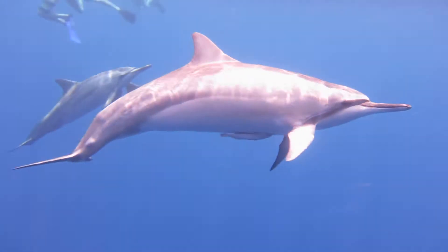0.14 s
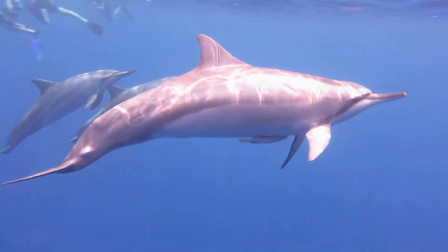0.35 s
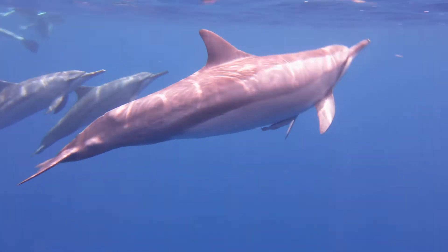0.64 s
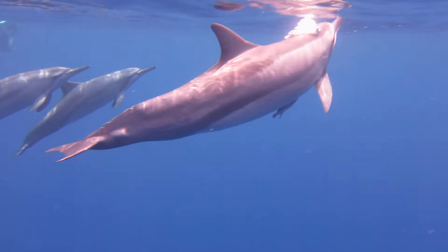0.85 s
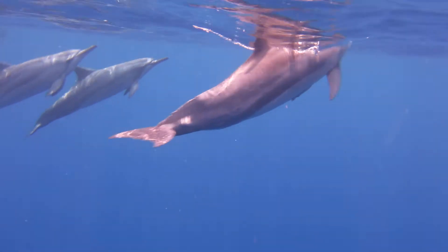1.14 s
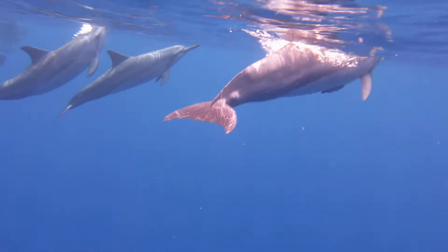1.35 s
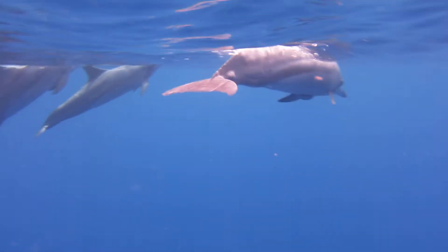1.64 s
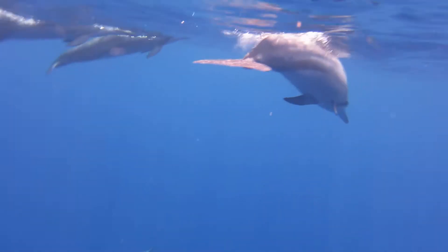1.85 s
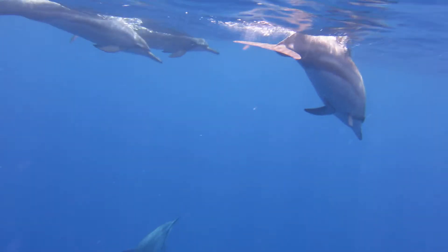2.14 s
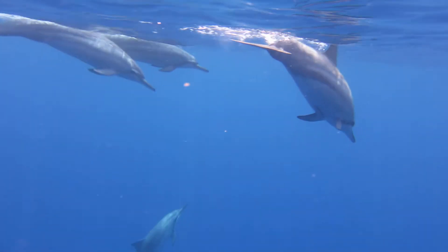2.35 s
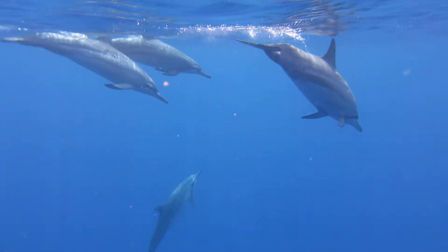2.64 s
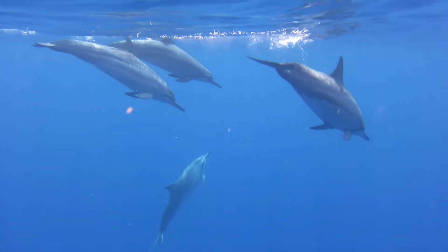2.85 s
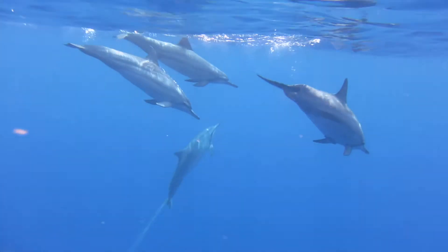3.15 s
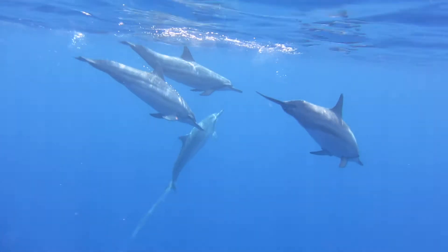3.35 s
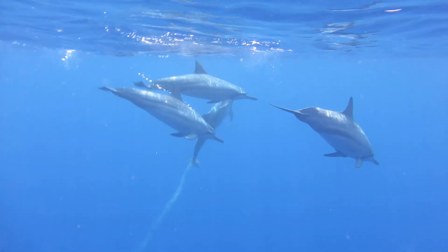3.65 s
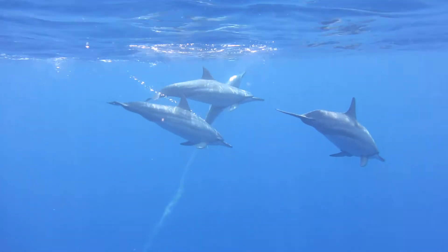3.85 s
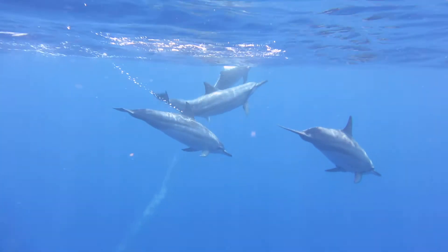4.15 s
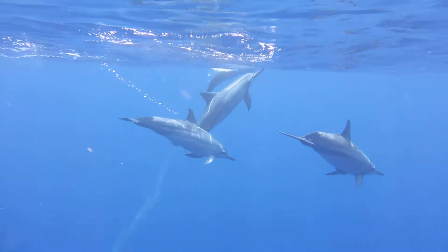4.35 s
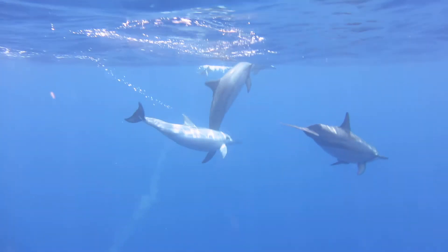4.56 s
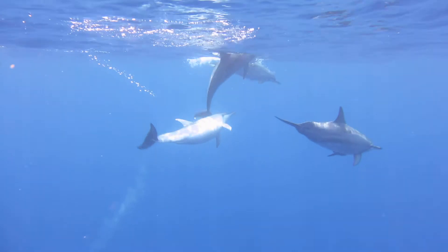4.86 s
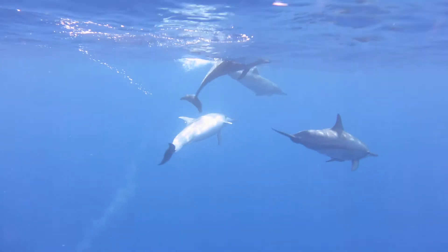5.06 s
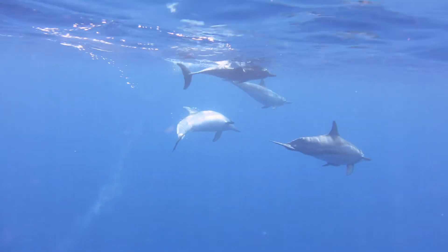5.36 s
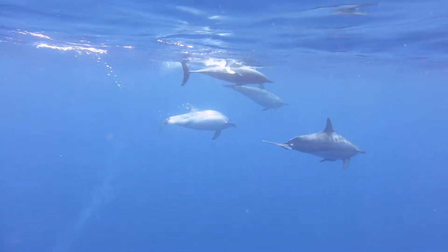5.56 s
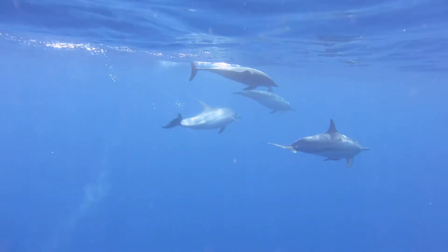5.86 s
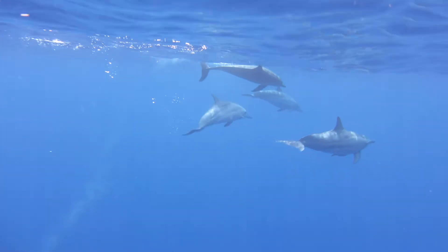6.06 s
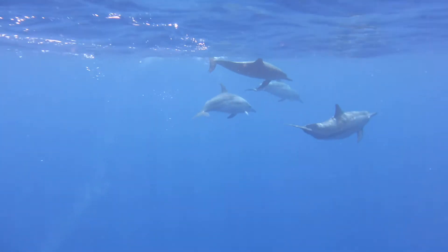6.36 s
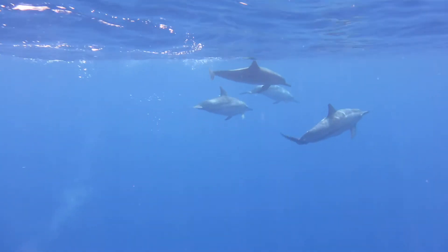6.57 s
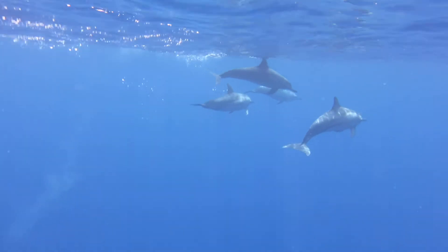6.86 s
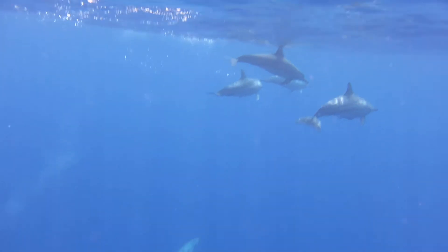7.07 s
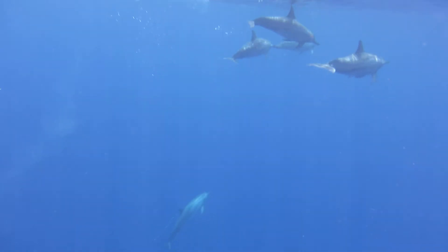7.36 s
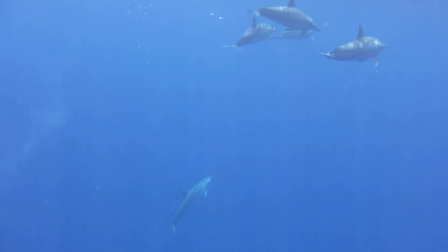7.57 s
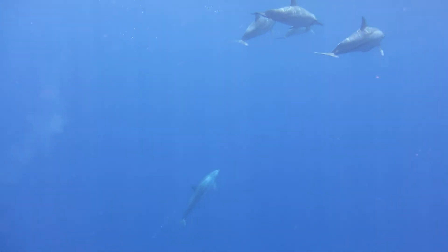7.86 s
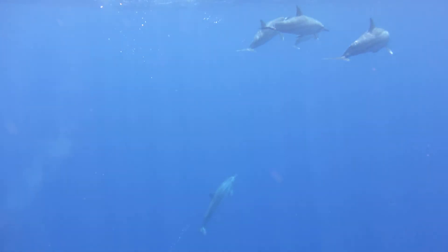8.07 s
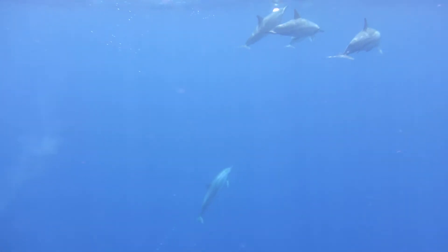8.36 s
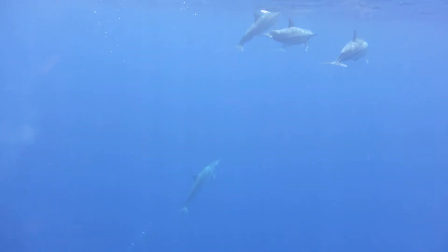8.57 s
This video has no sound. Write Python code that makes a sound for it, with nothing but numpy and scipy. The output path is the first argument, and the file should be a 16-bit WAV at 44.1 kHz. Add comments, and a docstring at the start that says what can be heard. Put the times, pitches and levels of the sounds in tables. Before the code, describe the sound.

A bright fizz of tiny bubbles dies away over the soft rush of open sea, heard from a camera held underwater. Uneven clusters of hollow knocks, small gurgles and faint finger rubbing come from its case. Quieter dolphins call all the way through with thin whistles that sweep up and dip, scattered clicks and four brief squawks. Past the middle, their clicks twice run together into a buzz.

```python
"""Dolphins pass a small camera in a waterproof case, just under the surface of a softly rushing sea.
First a cloud of bubbles fizzes. The hollow case starts to knock and gurgle in a swimmer's grip; it
colours the sounds from the water. Single dolphin clicks follow, then gliding whistles that echo off the
surface. Fingers rub the case, and rasping squawks lead into rising whistles. In the second half, two
runs of clicks come so fast that they buzz."""
import sys
import numpy as np
from scipy import signal
from scipy.fft import rfft, irfft, next_fast_len
from scipy.io import wavfile
from scipy.ndimage import uniform_filter1d, map_coordinates

SR = 44100
rng = np.random.default_rng(int(sys.argv[2]) if len(sys.argv) > 2 else 0)


def dump(signal):
    """Clip the signal to [-1, 1] and save it as 16-bit WAV at the path in sys.argv[1]."""
    limited = np.clip(np.atleast_2d(signal).T, -1, 1)
    pcm = np.round(limited * 32767).astype(np.int16)
    wavfile.write(sys.argv[1], SR, pcm)


N = 384552
T = np.arange(N) / SR
TOP_HZ = 15830  # the highest pitch the camera keeps


def amp(db):
    """Turn decibels into a gain."""
    return 10 ** (np.asarray(db) / 20)


def unit(x):
    """Scale a sound to an average power of 1."""
    return x / np.sqrt(np.mean(x ** 2) + 1e-20)


def along(points, hz):
    """Read between (pitch_hz, value) points on a musical pitch scale."""
    pitches, values = np.transpose(points)
    return np.interp(np.log(hz + 1), np.log(pitches + 1), values)


def wobble(rate):
    """A smooth curve through `rate` random values a second."""
    return map_coordinates(rng.standard_normal(int(N * rate / SR) + 4), [T * rate])


def filtered(x, response):
    """Change each frequency f in a sound by response(f)."""
    size = next_fast_len(N + SR // 2)
    return irfft(rfft(x, size) * response(np.fft.rfftfreq(size, 1 / SR)), size)[..., :N]


def resonances(modes):
    """A filter that rings at each (pitch_hz, width_hz, level_db)."""
    return lambda f: sum(amp(db) * 1j * f * width / (hz * hz - f * f + 1j * f * width)
                         for hz, width, db in modes)


def level(rows, fade_s=0.024):
    """A gain that follows (time_s, level_db) points and fades to silence outside them."""
    times, db = np.transpose(rows)
    return amp(np.interp(T, times, db)) * np.clip(np.minimum(T - times[0], times[-1] - T) / fade_s + 1, 0, 1)


def grains(rate, spread_db):
    """Random ticks, about `rate` a second, a few much larger than most."""
    size = amp(spread_db * rng.exponential(size=N)) * rng.standard_normal(N)
    return size * (rng.random(N) < rate / SR)


def placed(x, pan_db, lag_s, scatter_db=-4):
    """Two microphones: the left is pan_db louder and lag_s later; both get echoes inside the case."""
    side = np.array([[.5], [-.5]])
    direct = filtered(x, lambda f: amp(pan_db * side) * np.exp(-2j * np.pi * f * lag_s * side))
    tail = rng.standard_normal((2, SR // 40)) * amp(-60 * T[:SR // 40] / 0.008)
    echoes = signal.fftconvolve(direct, tail / np.linalg.norm(tail[0]), axes=1)[:, :N]
    return direct + amp(scatter_db) * echoes


# Where the wet microphone opening rings: pitch_hz, width_hz, level_db
PORT_TONES = [(3370, 330, 0), (5550, 520, 4.5), (10560, 530, -9), (12300, 2400, -5)]
def port(f, leak_db=-14):
    """The microphone opening favours its own tones, lets some of the rest leak by and dulls the top."""
    leak = amp(leak_db) * f / (f + 3000)
    return (resonances(PORT_TONES)(f) + leak) / (1 + (f / 14300) ** 20)


# The tone of the sea: pitch_hz, level_db
SEA_COLOUR = [(25, 4.5), (100, 3), (500, -3.5), (800, -11), (1200, -4.5), (1700, -11), (2600, -20.5),
              (13000, -27.5), (15700, -45)]
# How alike left and right are: pitch_hz, likeness (1 the same, -1 opposite)
SEA_LIKENESS = [(200, -0.63), (5000, 0.066)]
def sea():
    """Patchy noise of far surf and water; its bass pushes the two microphones opposite ways."""
    spectrum = signal.stft(rng.standard_normal((2, N)), nperseg=512)[2]
    patches = uniform_filter1d(uniform_filter1d(rng.standard_normal(spectrum.shape[1:]), 8, 0), 8, 1)
    noise = signal.istft(spectrum * amp(2.2 * unit(patches)), nperseg=512)[1][:, :N]
    colour = lambda f: amp(along(SEA_COLOUR, f)) * (1 + 0.57 * abs(port(f)))
    spread = lambda f: np.arccos(np.clip(along(SEA_LIKENESS, f), -1, 1)) / 2
    mid, side = filtered(noise, lambda f: colour(f) * [np.cos(spread(f)), np.sin(spread(f))])
    return amp(-43.5 + 0.41 * wobble(1.0)) * unit(np.array([mid + side, mid - side]))


# How the fizz swells and dies: time_s, level_db
FIZZ_LEVELS = [(0, -24.5), (.14, -22), (.34, -36), (.49, -49), (.52, -66)]
def fizz():
    """Tiny bubbles burst as dense ticks on a hiss; part of the cloud reaches each microphone alone."""
    def colour(f):
        through_port = np.hypot(abs(port(f)), 1.27 / (1 + (f / 13600) ** 20))
        treble = .12 + 1 / (1 + (4600 / (f + 1)) ** 8)
        return through_port * treble / np.hypot(1, f / 12000)

    froth = unit(grains(3000, 0.73)) + 0.3 * rng.standard_normal(N)
    cloud = placed(froth, pan_db=-5.5, lag_s=0.000185, scatter_db=-6) + 0.55 * rng.standard_normal((2, N))
    return level(FIZZ_LEVELS) * unit(filtered(cloud * amp(1.1 * wobble(92.5)), colour))


def ring(modes, t, attack_s):
    """Fading tones, with new strengths and slightly new pitches for each blow; the peak is 1."""
    tones = sum(amp(db + rng.normal(0, 5) - 60 * t / fade_s)
                * np.sin(2 * np.pi * hz * rng.normal(1, 0.032) * t) for hz, db, fade_s in modes)
    tones *= 1 - np.exp(-t / attack_s)
    return tones / np.abs(tones).max()


# Tones of the air in the case and of its stiff wall: pitch_hz, level_db, fade_s (time to fall 60 dB)
AIR_TONES = [(92, -12.5, 0.04), (276.6, -11.5, 0.033), (521.6, 1, 0.045), (778, -16.5, 0.048)]
WALL_TONES = [(1233, 11, 0.025), (1510, 23.5, 0.0073), (1982, 12.5, 0.025), (3096, 3.5, 0.024)]
# Blows on the case: start_s, level_db, crack_db (higher is sharper)
CASE_KNOCKS = [(0.105, -22.5, -19), (0.533, -20, -31), (0.579, -15, -30), (0.764, -28, -39),
               (0.96, -8.5, -21.5), (0.995, -10.5, -10), (1.038, -18.5, -20.5), (1.097, -25, -11.5),
               (1.138, -21.5, -14), (1.265, -27, -13), (1.317, -23, -30), (1.398, -20, -27.5),
               (1.461, -16.5, -27), (1.537, -21, -4), (1.562, -16, -33), (1.679, -5.5, -20.5),
               (1.73, -19, -27), (1.767, -7, -14), (1.806, -12.5, -26), (1.885, -12.5, -27),
               (1.904, -9.5, -17.5), (2.262, -17, -30.5), (2.29, -21.5, -24), (2.405, -12.5, -9.5),
               (2.423, -9, -26), (2.475, -9.5, -20), (2.651, -14.5, -21), (2.754, -17.5, -16),
               (2.78, -10.5, -8.5), (2.804, -19, -31), (2.843, -14, -20.5), (2.871, -16.5, -51),
               (3.211, -5.5, -21.5), (3.224, -6, -20), (3.276, -6.5, -16), (3.532, -12, -16.5),
               (3.644, -25.5, -42), (4.268, -15, -28), (4.306, -18.5, -35), (4.52, -32, -3.5),
               (4.89, -7.5, -25), (5.21, -30, -31), (5.257, -30, -7), (5.61, -16.5, -29),
               (5.667, -21.5, -45), (5.861, -25.5, -10.5), (6.218, -9.5, -25.5), (6.413, -7.5, -24),
               (6.434, -11.5, -18.5), (6.463, -18.5, -21), (6.956, -16.5, -20), (6.992, -16.5, -20.5),
               (7.098, -22.5, -21.5), (7.279, -20, -12), (7.294, -17.5, -30), (7.655, -11, -23.5),
               (7.752, -18, -30), (7.862, -15.5, -31), (7.962, -11.5, -29.5), (8.022, -13.5, -34),
               (8.105, -9.5, -23), (8.213, -16, -23.5), (8.367, -20.5, -15.5)]
def knocks():
    """Each blow rings the air inside, makes the wall snap and rattles on in three weaker taps."""
    out, t = np.zeros((2, N + SR)), np.arange(SR // 8) / SR
    for start, db, crack_db in CASE_KNOCKS:
        hollow = np.clip(1 - amp(crack_db), .1, 1)  # a sharp crack moves little air
        rattle = zip(rng.uniform(0.00612, 0.034, size=3), rng.normal(-21.0, 5.6, size=3))
        for late_s, weaker_db in [(0, 0), *rattle]:
            soft_noise = uniform_filter1d(uniform_filter1d(rng.standard_normal((2, len(t))), 4), 5)
            snap = 0.69 * amp(-60 * t / 0.031) * soft_noise
            wall = np.array([ring(WALL_TONES, t, 0.00031), ring(WALL_TONES, t, 0.0013)]) + snap
            air = ring(AIR_TONES, t, 0.0027) + 0.32 * np.array([ring(AIR_TONES, t, 0.0022) for _ in "LR"])
            blow = hollow * air + amp(crack_db + 12.5 + 0.43 * weaker_db) * wall
            out[:, round((start + late_s) * SR):][:, :len(t)] += amp(db - 1.5 + weaker_db) * blow
    return out[:, :N]


# Single bubbles: start_s, pitch_hz, level_db
BUBBLE_POPS = [(1.525, 1640, -21), (1.562, 4130, -15.5), (1.596, 1980, -28.5), (7.309, 2200, -9.5)]
GURGLE_S, GURGLE_HZ, GURGLE_DB = .08, 645, -17  # a swarm's length, typical pitch, level against its knock
def pops():
    """Bubbles ring briefly, rough and rising in pitch: a swarm shaken loose by each knock, a few alone."""
    out, t = np.zeros(N + SR), np.arange(SR // 20) / SR
    swarm = [(start + GURGLE_S * rng.random(),
              GURGLE_HZ * np.exp(rng.normal(0, 0.53)),
              db + rng.normal(GURGLE_DB, 3.77)) for start, db, _ in CASE_KNOCKS for bubble in range(6)]
    for bubbles, cycles in (BUBBLE_POPS, 45), (swarm, 7):
        for start, hz, db in bubbles:
            age = t * hz / cycles  # reaches 1 when the ring has fallen 60 dB
            rough = 1 + 0.84 * uniform_filter1d(rng.standard_normal(len(t)), int(SR / hz)) * np.sqrt(SR / hz)
            gain = amp(db - 60 * age) * (1 - np.exp(-t * hz))
            tone = np.sin(2 * np.pi * hz * t * (1 + 0.37 * age))
            out[round(start * SR):][:len(t)] += gain * rough * tone
    return placed(out[:N], pan_db=-4.5, lag_s=0, scatter_db=1.0)


# Clicks from dolphins close by: start_s, level_db
NEAR_CLICKS = [(0.4273, -44), (0.4546, -45.5), (0.489, -42.5), (1.564, -31), (3.24, -42.5)]
def clicks():
    """Near clicks are short, bright bursts of noise; far dolphins tick faintly all the time."""
    near, t = np.zeros(N + SR), np.arange(SR // 20) / SR
    for start, db in NEAR_CLICKS:
        gain = amp(db + 15.0 - 60 * t / 0.039) * (1 - np.exp(-t / 0.0011))
        near[round(start * SR):][:len(t)] += gain * rng.standard_normal(len(t))
    far = amp(-55) * unit(grains(90, 1.8))
    heard = filtered(near[:N], lambda f: port(f, leak_db=-0.5)) + filtered(far, port)
    return placed(heard, pan_db=-3, lag_s=0.00002)


# Whistle shapes; each dolphin repeats its own: share_of_length, above_base_hz
SWEEP = [(0, 7), (.35, 3798), (.65, 7302), (1, 9504)]
VEE = [(0, 6297), (.07, 2304), (.15, 637), (.25, 5), (.4, 1094), (.64, 3400), (1, 6300)]
STEP = [(0, 3.1), (.08, 2600), (.24, 3600), (.6, 4500), (.84, 5639), (1, 7300)]
SAG = [(0, 1653), (.17, 844), (.5, 194), (.76, -5), (1, 1144)]
DIP = [(0, 1898), (.22, 610), (.42, 0), (.75, 800), (1, 1600)]
DROP = [(0, 2600), (.4, 1600), (.75, 2), (1, 370)]
CLIMB = [(0, 693.5), (.14, -4), (.45, 1004), (.68, 2992), (.84, 4898), (1, 6300)]
STAIR = [(0, 3), (.04, 890), (.1, 1592), (0.331, 2904), (.56, 4522), (.7, 5898), (.89, 7711), (1, 10404)]
TERRACE = [(0, 0), (.2, 602), (.32, 1900), (.45, 2198), (.57, 3200), (1, 4500)]
# How well each pitch gets through: pitch_hz, gain_db
PITCH_CARRY = [(5600, 6.5), (8300, -17), (10600, -3.5), (12600, 5.5), (14800, -11)]
# The whistles: start_s, length_s, shape, base_hz, level_db
WHISTLES = [(0.69, .56, TERRACE, 10200, -52.5), (0.898, 0.46, SAG, 13400, -54),
            (1.28, 0.088, SWEEP, 5680, -39), (1.773, 0.22, DIP, 13760, -42),
            (1.792, 0.47, CLIMB, 9480, -39.5), (2.71, 0.15, SWEEP, 6400, -36.5),
            (2.812, 0.89, STAIR, 5230, -48), (3.136, 0.061, DROP, 14500, -53),
            (3.523, 0.37, SAG, 13500, -62), (4.024, 0.29, VEE, 8730, -38.5),
            (4.195, 0.12, SWEEP, 6000, -35.5), (4.676, 0.16, DROP, 12440, -44.5),
            (4.715, 0.19, DIP, 14560, -37), (6.195, 0.12, SWEEP, 5980, -40.5),
            (6.72, 0.46, SAG, 13300, -47), (6.78, 0.17, DIP, 13800, -41), (6.99, 0.53, STEP, 7770, -41.5),
            (7.066, 0.34, VEE, 8640, -38.5), (7.705, 0.45, CLIMB, 9370, -54.5)]
SWELL_DB, OCTAVE_DB = 2.5, -12  # a whistle's growth from start to end; its overtone
ECHO_S, ECHO_DB = .045, -25  # the echo off the surface
def whistles():
    """Gliding tones, loud where the pitch carries; paths of different length make them flutter."""
    out = np.zeros((2, N))
    for start, length, shape, base_hz, db in WHISTLES:
        share, above_hz = np.transpose(shape)
        position = np.interp(T, start + length * share, np.arange(len(share)))
        points_hz = np.pad(base_hz + above_hz, 1, mode="reflect", reflect_type="odd")
        glide = map_coordinates(points_hz, [position + 1], order=2)  # a smooth curve through the points
        pitch = uniform_filter1d(glide, SR // 50) * (1 + 0.006 * wobble(30))
        phase = 2 * np.pi * np.cumsum(pitch) / SR
        tone = amp(along(PITCH_CARRY, pitch)) * np.sin(phase)
        octave = amp(OCTAVE_DB + along(PITCH_CARRY, 2 * pitch)) * (2 * pitch < TOP_HZ) * np.sin(2 * phase)
        rough = 1 + .55 * wobble(500)
        flutter = amp(3.5 * np.array([wobble(36), wobble(45)]))
        swell = np.sqrt(2) * level([(start, db - SWELL_DB), (start + length, db)])
        out += swell * flutter * rough * (tone + octave)
    out *= amp([[-1.1], [1.1]])  # the left microphone faces away: quieter and a little later
    out[0] = np.roll(out[0], 5)
    echo = np.pad(out, ((0, 0), (round(ECHO_S * SR), 0)))[:, :N]
    return out + amp(ECHO_DB) * echo


# The grip sliding on the case: time_s, level_db
RUB_LEVELS = [(0, -86), (1.2, -42), (2.1, -53), (3.4, -60.5), (5.7, -53.5), (6.25, -36), (6.9, -50.5),
              (8.3, -47.5), (8.72, -52.5)]
def rub():
    """Fingers slip on the case; their soft, uneven pushes ring the air inside."""
    slips = unit(grains(700, 1.5)) * amp(3 * wobble(14))
    body = resonances([(hz, 4.1 / fade_s, db) for hz, db, fade_s in AIR_TONES])
    return level(RUB_LEVELS) * unit(filtered(slips, lambda f: body(f) / (1 + (f / 900) ** 2)))


# Rasps that lead into a rising whistle: start_s, end_s, level_db, from_hz, to_hz
SQUAWK_CALLS = [(1.19, 1.267, -46, 3050, 5900), (2.662, 2.738, -40.5, 5420, 6320),
                (4.114, 4.2, -41, 5790, 6000), (6.117, 6.215, -43.5, 5450, 6470)]
def squawks():
    """Bursts of fast, uneven pulses swell toward their end while a rough tone climbs through them."""
    pulses = grains(4000, 1.5) * amp(1.5 * wobble(120))
    rasp = unit(filtered(pulses, lambda f: port(f, leak_db=-8) / (1 + (f / 11000) ** 3)))
    out = np.zeros(N)
    for start, end, db, from_hz, to_hz in SQUAWK_CALLS:
        phase = 2 * np.pi * np.cumsum(np.interp(T, [start, end], [from_hz, to_hz])) / SR
        tone = np.sin(phase) + amp(-10) * np.sin(2 * phase) + amp(-7) * np.sin(0.65 * phase)
        swell = level([(start, db - 4), (end - .03, db), (end, db - 4)], fade_s=0.012)
        out += swell * (rasp + 1.4 * unit(wobble(1000) * tone))
    return placed(out, pan_db=0.5, lag_s=-0.000035, scatter_db=-10)


# Fast runs of clicks: start_s, loudest_s, end_s, clicks_per_s, level_db
CLICK_RUNS = [(4.55, 4.888, 5.05, 320, -43.5), (6.355, 6.393, 6.43, 540, -46)]
BUZZ_SWELL_DB, BUZZ_WAVER = 8.5, .03  # rise from either end to the peak; share by which the rate wanders
def buzzes():
    """Regular, slightly ragged clicks blur into a buzz over a hiss of scattered echoes."""
    out = np.zeros(N)
    for start, peak, end, rate, db in CLICK_RUNS:
        count = np.cumsum(rate * (1 + BUZZ_WAVER * wobble(18))) / SR
        ticks = (np.diff(np.floor(count), prepend=0) > 0) * amp(1.9 * rng.standard_normal(N))
        echoes = .35 * rng.standard_normal(N)
        buzz = filtered(unit(ticks) + echoes, lambda f: port(f, leak_db=-25) / (1 + (f / 8000) ** 4))
        swell = level([(start, db - BUZZ_SWELL_DB), (peak, db), (end, db - BUZZ_SWELL_DB)], fade_s=0.0068)
        out += swell * unit(buzz)
    return placed(out, pan_db=1.5, lag_s=-.00001, scatter_db=-12)


def scene():
    """The dolphins, the bubbles, the handled case and the sea, added together."""
    dolphins = whistles() + squawks() + buzzes() + clicks()
    return dolphins + fizz() + pops() + knocks() + rub() + sea()


def record(dry):
    """The camera cuts the deepest bass and keeps nothing above TOP_HZ."""
    return filtered(dry, lambda hz: (hz < TOP_HZ) * (1j * hz / (45 + 1j * hz)) ** 2)


dry = scene()
out = record(dry)
dump(out)
```